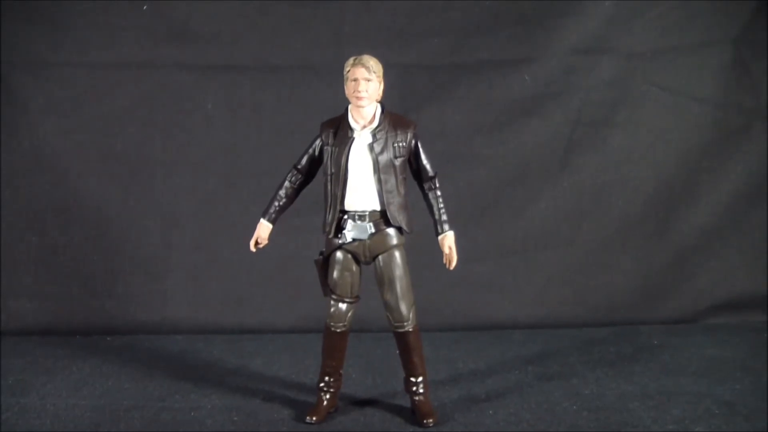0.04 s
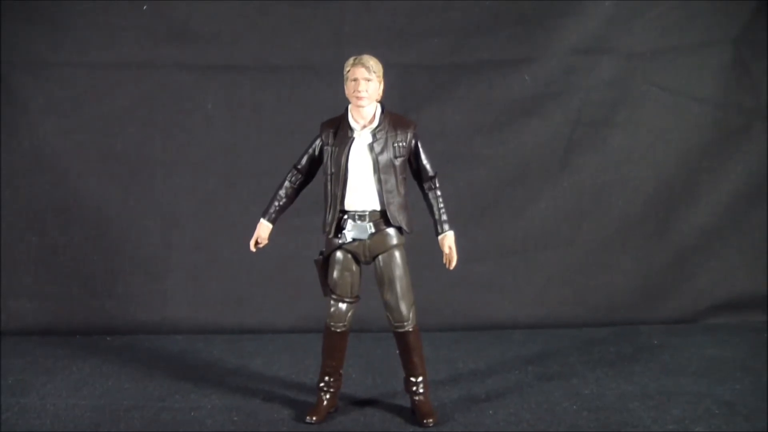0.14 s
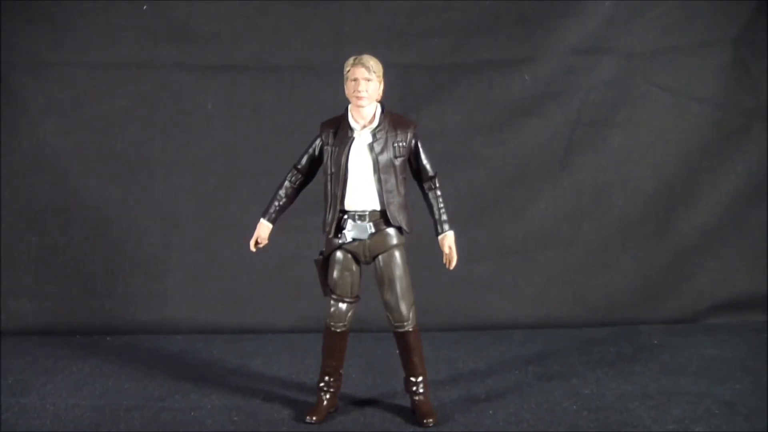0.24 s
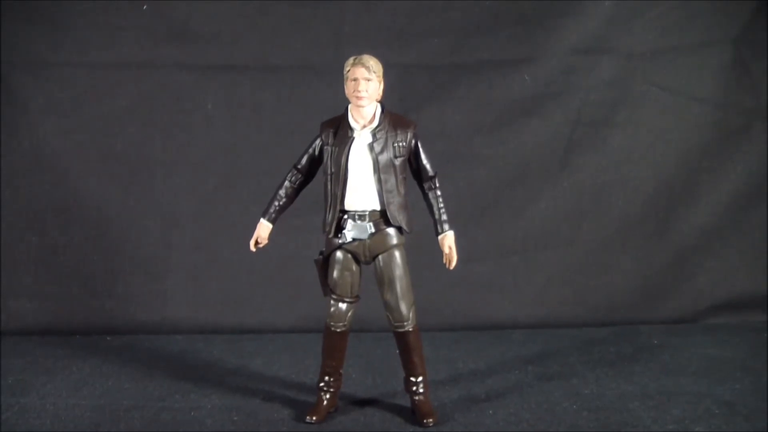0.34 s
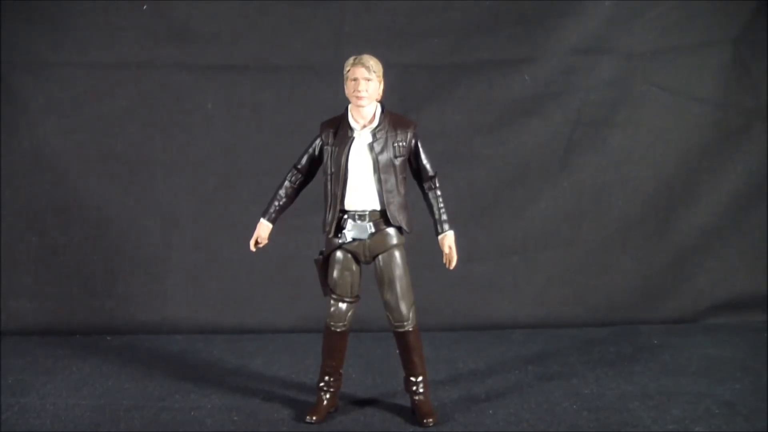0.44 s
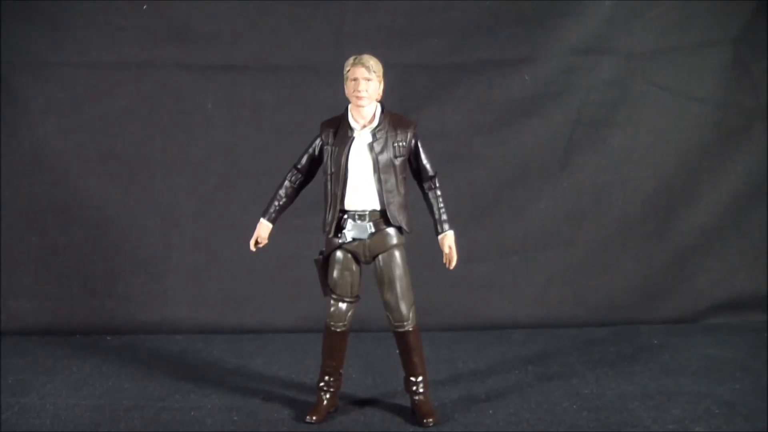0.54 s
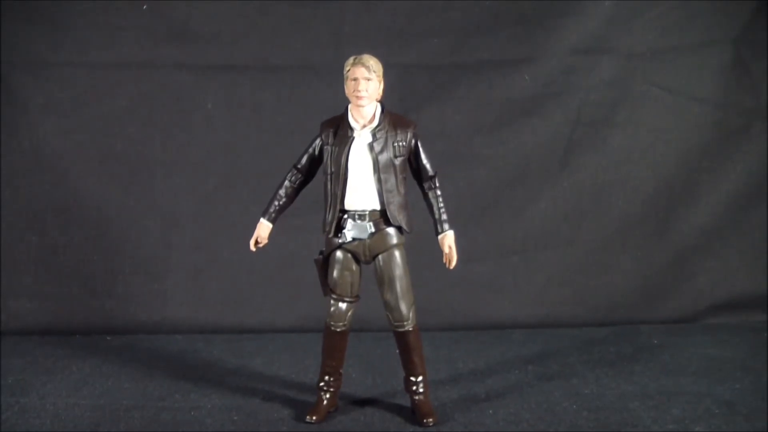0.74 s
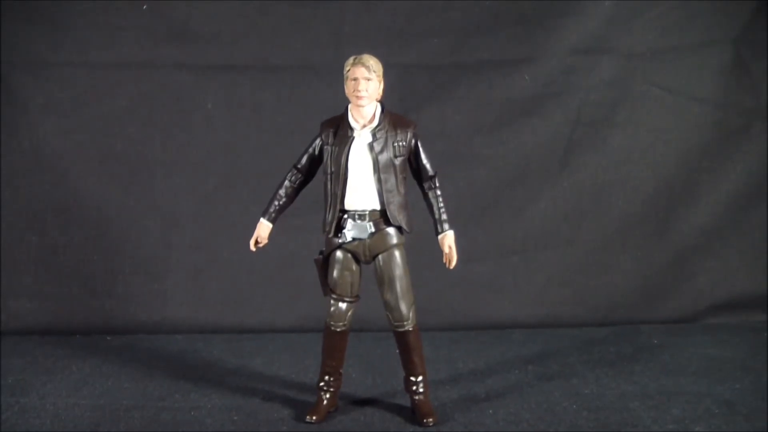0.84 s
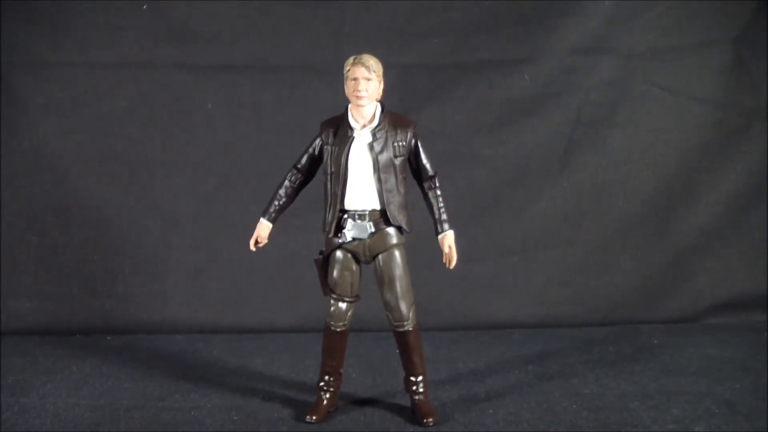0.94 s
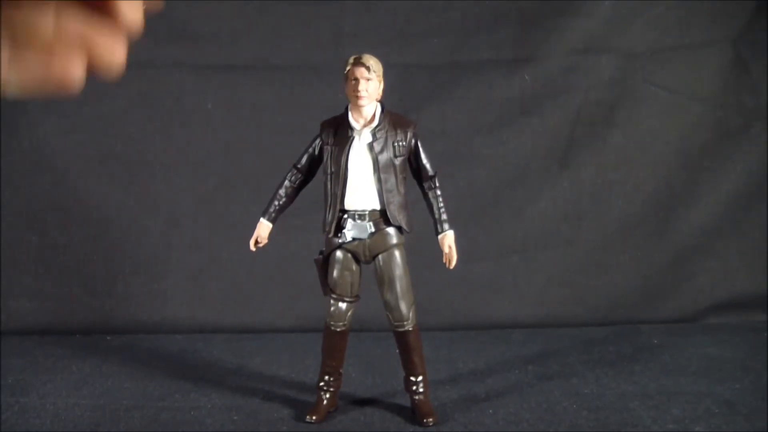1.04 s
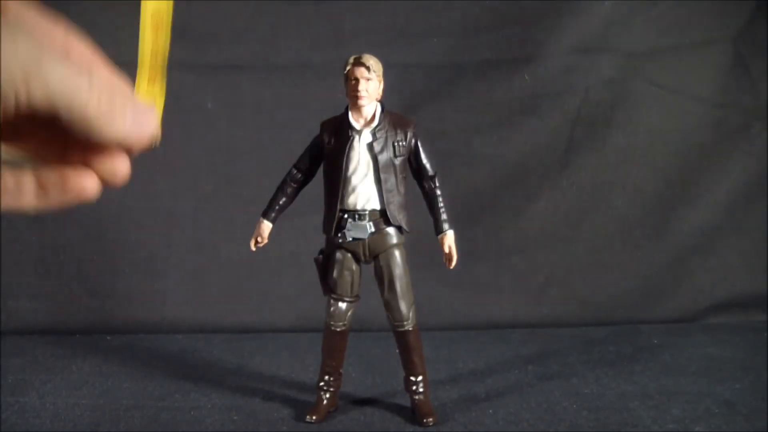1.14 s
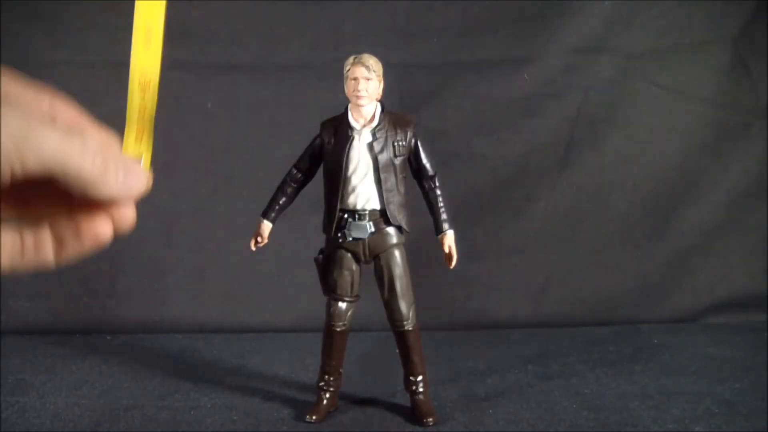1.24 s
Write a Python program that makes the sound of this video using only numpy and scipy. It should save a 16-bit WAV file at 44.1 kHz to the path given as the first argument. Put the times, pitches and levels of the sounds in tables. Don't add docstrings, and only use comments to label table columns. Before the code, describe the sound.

A retractable steel tape measure is drawn out: a few handling clicks, a faint scrape, a quick rattling rasp with sharp snaps, then a short metallic ring and last ticks, close to the microphone in a quiet room.

```python
import sys
import numpy as np
from scipy import signal
from scipy.fft import rfft, irfft
from scipy.io import wavfile

SR = 44100
rng = np.random.default_rng(int(sys.argv[2]) if len(sys.argv) > 2 else 0)


def dump(signal):
    limited = np.clip(np.atleast_2d(signal).T, -1, 1)
    pcm = np.round(limited * 32767).astype(np.int16)
    wavfile.write(sys.argv[1], SR, pcm)


def decibels_to_gain(level_db):
    exponent = np.asarray(level_db, float) / 20
    return 10 ** exponent


N = 57330

# frequency in Hz, side minus mid in dB.
WIDTH = [(60, -14), (300, -20), (1000, -22), (2000, -17), (4000, -12), (8000, -5), (12000, 0), (16000, 1)]
OPPOSITE = np.array([[1], [-1]])


def rms_one(x):
    return x / np.sqrt(np.mean(x ** 2) + 1e-20)


def colour(x, points):
    hz, db = np.transpose(points)
    f = np.maximum(np.fft.rfftfreq(x.shape[-1], 1 / SR), 1)
    gain = decibels_to_gain(np.interp(np.log(f), np.log(np.maximum(hz, 1)), db))
    return irfft(rfft(x) * gain, x.shape[-1])


def ring(x, hz, t60):
    r = decibels_to_gain(-60 / (t60 * SR))
    w = 2 * np.pi * hz / SR
    return signal.lfilter([0, np.sin(w)], [1, -2 * r * np.cos(w), r * r], x + 1e-18)


def drift(rate):
    r = np.exp(-2 * np.pi * rate / SR)
    noise = rng.standard_normal(N + SR)
    settled = signal.lfilter([1], [1, -2 * r, r * r], noise)[SR:]
    return rms_one(settled)


def level(rows):
    s, db = np.transpose(rows)
    return decibels_to_gain(np.interp(np.arange(N) / SR, s, db, left=-120, right=-120))


def left_tilt(db):
    return decibels_to_gain(0.5 * OPPOSITE * db)


def floor():
    # frequency in Hz, level in dB.
    noise_spectrum = [(12, -27), (20, 3.5), (154, -5), (337, -11.5), (422, -8.5), (1290, -15), (1660, -15),
                      (6360, -21), (16000, -27.5)]
    noise_db, patchy_db, left_db = -48.5, 0.7, -2
    alike = 0.4
    noise = rms_one(colour(rng.standard_normal((2, N)), noise_spectrum))
    mid, side = noise * decibels_to_gain(patchy_db * drift(21))
    pair = mid + np.sqrt((1 - alike) / (1 + alike)) * side * OPPOSITE
    rumble = decibels_to_gain(-57.5) * rms_one(ring(pair, hz=67, t60=0.37))
    whine = decibels_to_gain(-62) * np.sin(2 * np.pi * 15652 * np.arange(N) / SR)
    return (decibels_to_gain(noise_db) * pair + rumble) * left_tilt(left_db) + whine


def knocks(rows, spectrum, ring_s, crack_s, touch_s):
    second_ring_db = -6
    out = np.zeros(N + SR)
    t = np.arange(4096) / SR
    cracks = rms_one(colour(rng.standard_normal((len(rows), len(t))), spectrum))
    swell = np.sin(np.pi / 2 * np.minimum(t / touch_s, 1)) ** 2
    after = np.maximum(t - touch_s, 0)
    ring_decay = 1000. ** (-after / ring_s)
    crack_decay = 1000. ** (-after / crack_s)
    for (s, db, main_hz, second_hz, ring_db), crack in zip(rows, cracks):
        rings = np.sin(2 * np.pi * main_hz * t)
        rings = rings + decibels_to_gain(second_ring_db) * np.sin(2 * np.pi * second_hz * t)
        sound = decibels_to_gain(ring_db) * rings * ring_decay + 0.5 * crack * crack_decay
        start = int(s * SR)
        out[start:start + len(t)] += decibels_to_gain(db) * swell * sound
    return out[:N]


def clicks():
    # start in seconds, crack peak in dB, main ring in Hz, second ring in Hz,
    # rings over crack in dB.
    contacts = [(.019, -40, 4150, 6800, -1), (.2029, -11.5, 1940, 7300, -4.5), (.2155, -27, 1980, 11500, 0),
                (.2593, -19.5, 7600, 4300, -8.5), (.2665, -39, 2050, 6840, 11),
                (.3078, -21, 7440, 4830, -10), (.3285, -11, 4750, 7900, -14), (.3346, -17.5, 3360, 1656, 5),
                (.7945, -38, 680, 1870, 8), (.8432, -25, 3390, 1800, 7), (.9408, -29, 1890, 3220, 5),
                (.9425, -34, 3780, 1410, 5), (1.0798, -40, 3850, 3100, 4),
                (1.1182, -24.5, 3620, 2590, -4.5), (1.1742, -33.5, 4120, 10000, -2.5)]
    # frequency in Hz, level in dB per Hz.
    tick_spectrum = [(150, -44), (400, -7), (1000, -12), (1600, -4), (3500, -1.5), (7000, 0), (12000, -9),
                     (16000, -10.5)]
    return knocks(contacts, tick_spectrum, ring_s=0.01, crack_s=0.01, touch_s=0.00096)


def edge_slips():
    grains_per_s, grain_spread_db, low_cut_hz = 3100, 0.5, 220
    size_db = grain_spread_db * np.minimum(rng.exponential(1, (2, N)), 5)
    grains = decibels_to_gain(size_db) * rng.choice([-1, 1], (2, N))
    chance = grains_per_s * decibels_to_gain(4 * drift(60)) / SR
    slips = grains * (rng.random((2, N)) < chance) + 0.29 * rng.standard_normal((2, N))
    return signal.sosfilt(signal.butter(2, low_cut_hz, "high", fs=SR, output="sos"), slips)


def rasp_through_case(slips):
    # frequency in Hz, level in dB per Hz.
    rasp_spectrum = [(88, -61), (150, -54), (466, -22), (601, -10), (745, -2.5), (1340, -15), (2060, 6),
                     (7920, 2.5), (16000, -3)]
    # frequency in Hz, bandwidth in Hz, level in dB.
    case_modes = [(740, 60, -9), (2050, 200, 0.5), (2380, 150, -50), (3080, 200, -44), (4300, 200, 6),
                  (5900, 250, -10), (6300, 200, -2), (7900, 1200, 6), (9700, 400, -3)]
    case_db, wander_db = -10.5, 2.5
    case = 0
    for hz, width, db in case_modes:
        mode = rms_one(ring(slips, hz, 2.2 / width))
        case = case + decibels_to_gain(db + wander_db * drift(40)) * mode
    direct = rms_one(colour(slips, rasp_spectrum))
    return rms_one(direct + decibels_to_gain(case_db) * rms_one(case))


def blade_modes(slips):
    # frequency in Hz, level in dB, 60 dB decay time in seconds.
    steel_modes = [(3110, -6, .1), (3200, -2, .14), (3235, 0, .16), (3330, -8, .09), (3445, -6, .09),
                   (3570, -12, .07), (3720, -9, .07), (4080, -12, .06), (4850, -12, .06), (6120, -12, .08)]
    blade = sum(decibels_to_gain(db) * rms_one(ring(slips, hz, t60)) for hz, db, t60 in steel_modes)
    high_pass = signal.butter(4, 2800, "high", fs=SR, output="sos")
    return rms_one(signal.sosfilt(high_pass, blade))


def rub():
    # time in seconds, level in dB.
    creep = [(.2, -70.5), (.207, -38), (.235, -42.5), (.26, -40), (.3, -37), (.34, -34), (.37, -37.5),
             (.395, -36)]
    # time in seconds, level in dB.
    pull = [(.395, -31.5), (.425, -22), (.46, -18.5), (.51, -24.5), (.548, -29), (.558, -27), (.66, -27.5),
            (.75, -43), (.86, -53)]
    # time in seconds, level in dB.
    shiver = [(.57, -45), (.582, -24), (.607, -21), (.635, -43), (.665, -25.5), (.72, -42), (.775, -38),
              (.81, -52), (.92, -53)]
    slips = edge_slips()
    rasp = rasp_through_case(slips)
    body = decibels_to_gain(-7) * rms_one(ring(slips, hz=800, t60=0.0094))
    creeping = level(creep) * (rasp + body)
    pulling = level(pull) * rasp
    shivering = level(shiver) * blade_modes(slips)
    return creeping + pulling + shivering


def thuds():
    # start in seconds, peak in dB, frequency in Hz, 60 dB decay time in seconds.
    pushes = [
        (0.26, -35.5, 223, 0.077),
        (.44, -36.5, 276, 0.084),
        (.492, -31.5, 420, .04),
        (0.6, -23, 676, 0.011),
        (0.87, -36, 344, 0.038),
        (.203, -31, 780, 0.011),
        (0.31, -27, 900, 0.0091),
        (0.42, -32, 450, 0.025),
        (.943, -34.5, 644, 0.03),
        (.247, -37, 550, 0.024),
    ]
    out = 0
    for s, db, hz, t60 in pushes:
        t = np.maximum(np.arange(N) / SR - s, 0)
        onset = np.minimum(t * hz, 1)
        out = out + decibels_to_gain(db - 60 * t / t60) * np.sin(2 * np.pi * hz * t) * onset
    return out


def jolts():
    # start in seconds, crack peak in dB, main ring in Hz, second ring in Hz,
    # rings over crack in dB.
    releases = [(.398, -17.5, 3140, 6700, 0.5), (.4115, -35, 8540, 3160, -10),
                (.4222, -4.5, 2910, 5320, -10.5), (.436, -12.5, 7900, 10100, -3),
                (.4445, -6.5, 4330, 2010, -5.5), (.455, -13, 740, 5330, -5),
                (.4645, -15.5, 810, 2500, -0.5), (.4715, -27, 5500, 3330, -17),
                (.4855, -11, 6200, 9750, -2), (.4945, -23, 2290, 4540, 6.5),
                (.5038, -13.5, 6330, 2080, 0.5), (.5526, -8, 5900, 4180, -2.5),
                (.5590, -17.5, 6480, 3750, 6), (.5753, -9.5, 5884, 6030, 7.5), (.601, -5, 3560, 5650, -0.5)]
    # frequency in Hz, level in dB per Hz.
    crack_spectrum = [(150, -26), (400, -11), (1000, -9), (2000, -3), (3200, -4), (7500, -2), (13000, -7),
                      (16000, -12)]
    return knocks(releases, crack_spectrum, ring_s=0.011, crack_s=0.02, touch_s=0.0012)


def table_echo(hits):
    lag = int(0.0043 * SR)
    hits[lag:] += decibels_to_gain(-11) * hits[:-lag]
    return hits


def ports(hits, rubbing):
    scatter_s, left_db = 0.018, -1
    t = np.arange(1024) / SR
    scatter = rng.standard_normal(len(t)) * 1000. ** (-t / scatter_s)
    scatter = scatter / np.sqrt(np.sum(scatter ** 2))
    mid = hits + rubbing[0]
    side = colour(signal.fftconvolve(hits, scatter)[:N] + rubbing[1], WIDTH)
    return (mid + side * OPPOSITE) * left_tilt(left_db)


def room(x):
    t60_s, first_s, wall_cut_hz = 0.3, 0.008, 10000
    t = np.arange(SR // 2) / SR
    mid, side = rng.standard_normal((2, len(t))) * 1000. ** (-t / t60_s) * (t > first_s)
    tail = mid + colour(side, WIDTH) * OPPOSITE
    tail = signal.sosfilt(signal.butter(1, wall_cut_hz, fs=SR, output="sos"), tail)
    tail = tail / np.sqrt(np.sum(tail[0] ** 2))
    return signal.fftconvolve(x[None], tail, axes=1)[:, :N]


def scene():
    hits = table_echo(clicks() + jolts()) + thuds()
    rubbing = rub()
    reverberation = decibels_to_gain(-19) * room(hits + rubbing[0])
    return ports(hits, rubbing) + reverberation + floor()


def roll_off(x):
    return signal.sosfilt(signal.butter(12, 16480, fs=SR, output="sos"), x)


def record(dry):
    low_pass = signal.cheby2(20, 50, 16000, fs=SR, output="sos")
    high_pass = signal.butter(2, 36, "high", fs=SR, output="sos")
    cut = signal.sosfilt(high_pass, signal.sosfilt(low_pass, dry))
    return roll_off(np.clip(cut, -1, 1))


dry = scene()
out = record(dry)
dump(out)
```